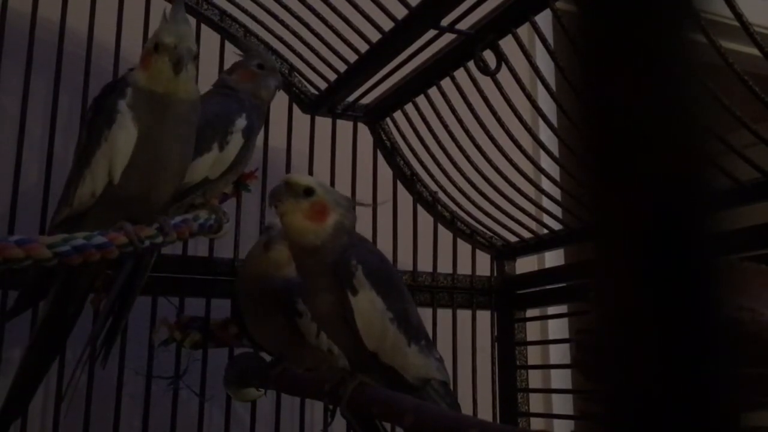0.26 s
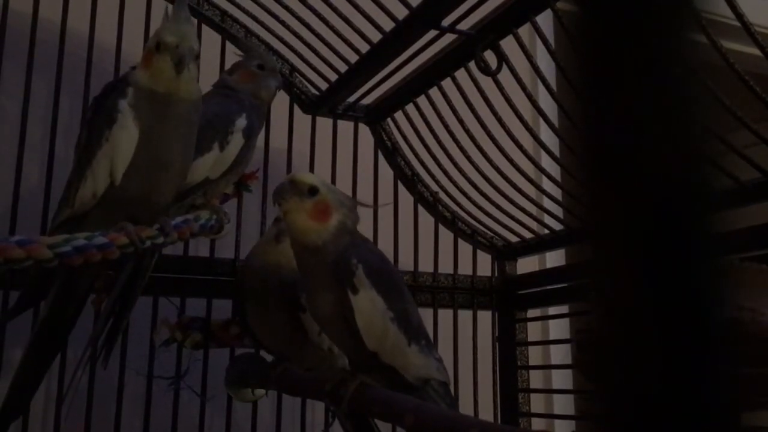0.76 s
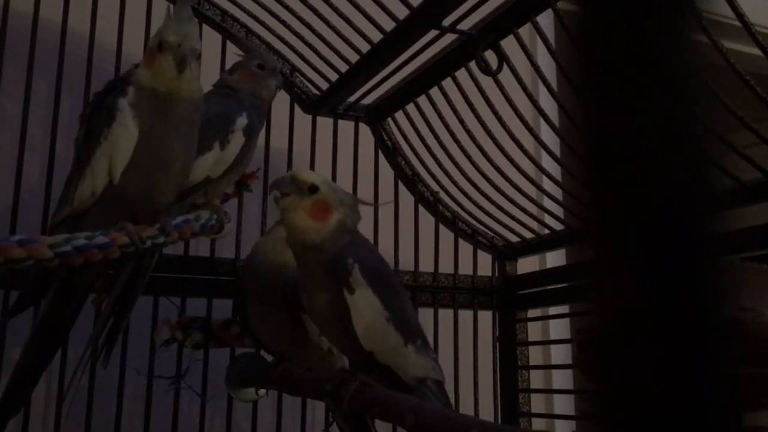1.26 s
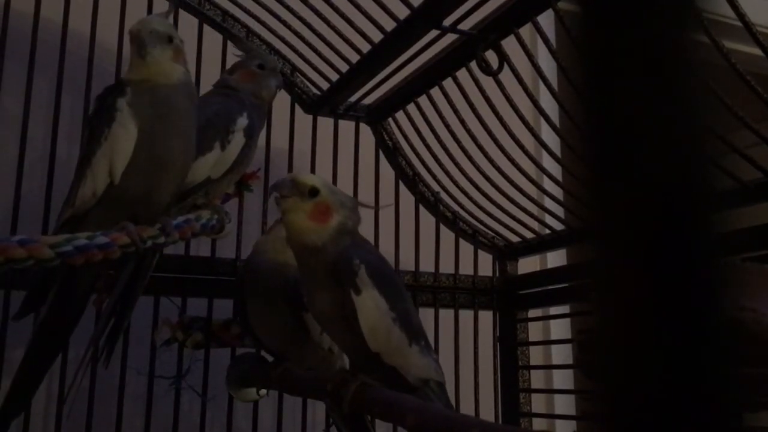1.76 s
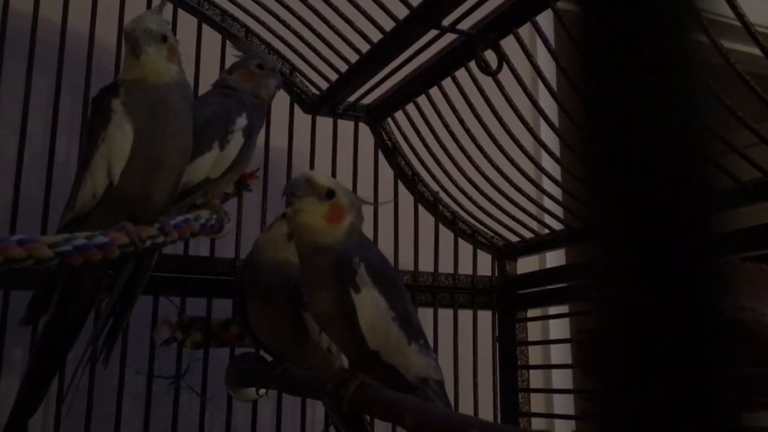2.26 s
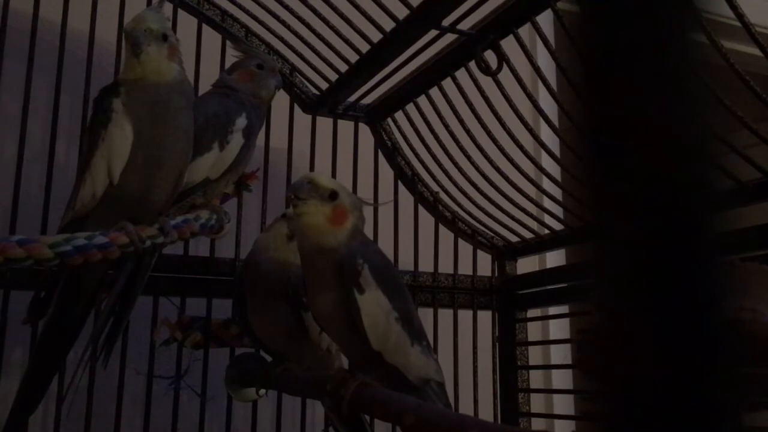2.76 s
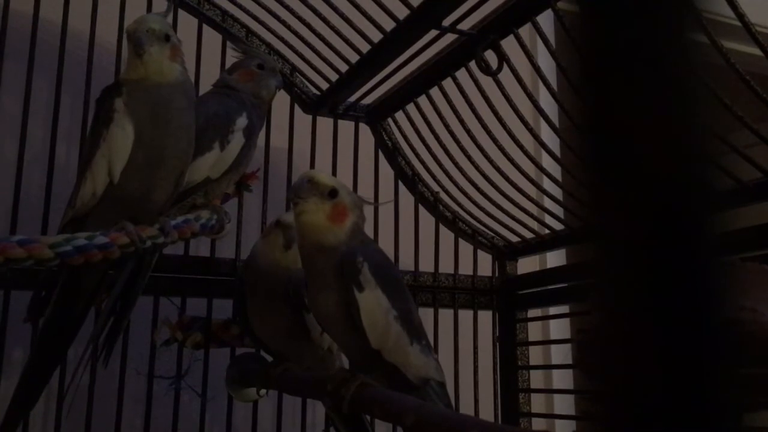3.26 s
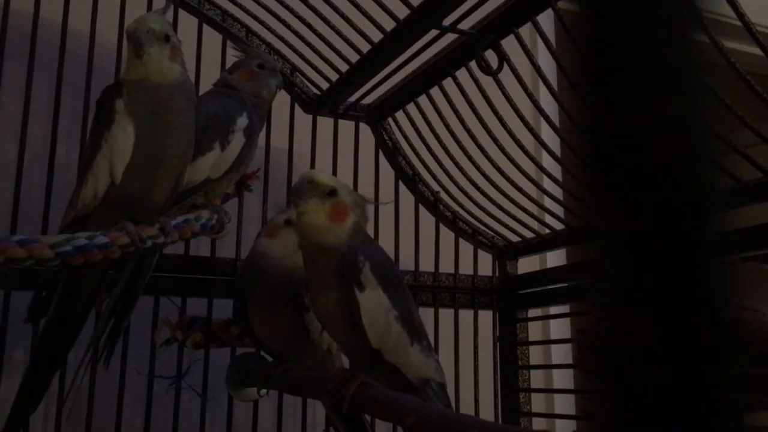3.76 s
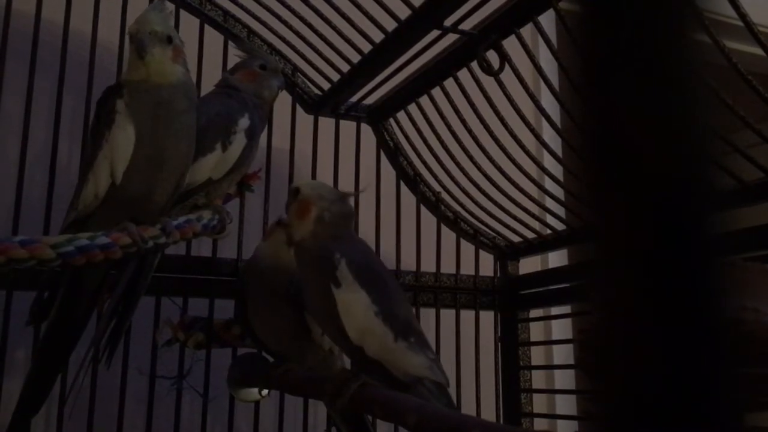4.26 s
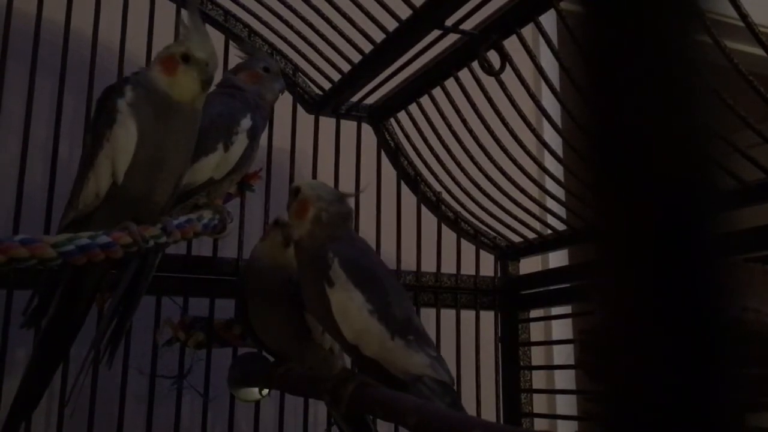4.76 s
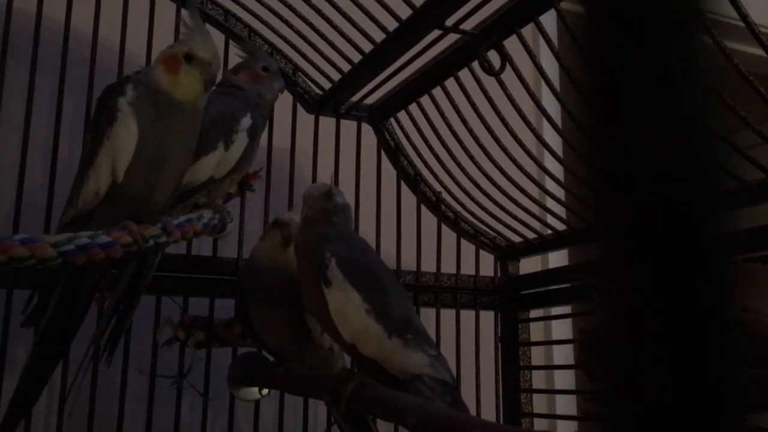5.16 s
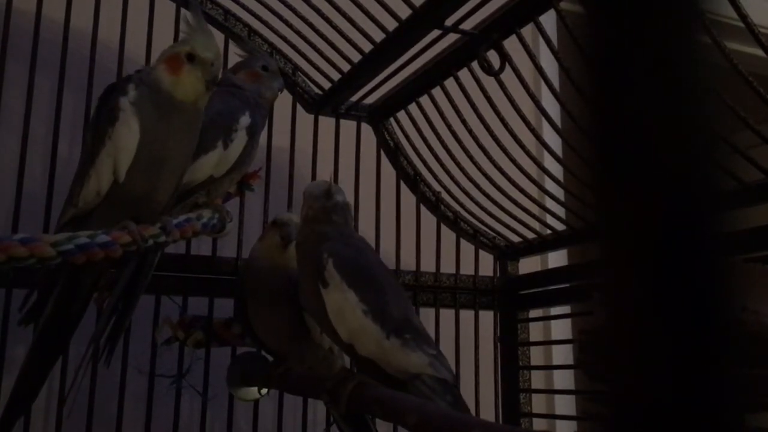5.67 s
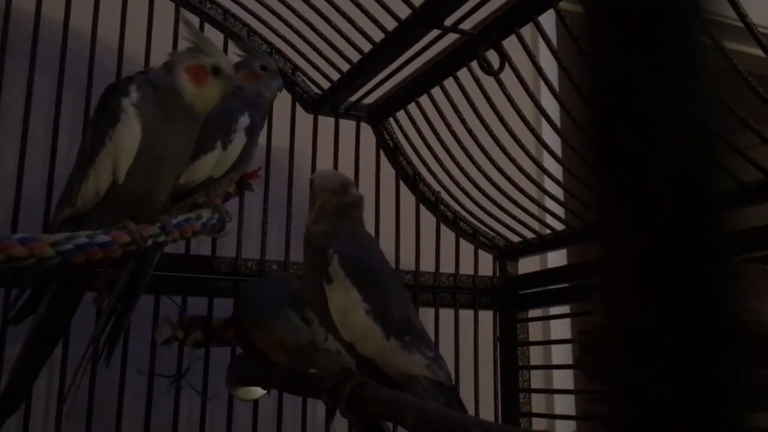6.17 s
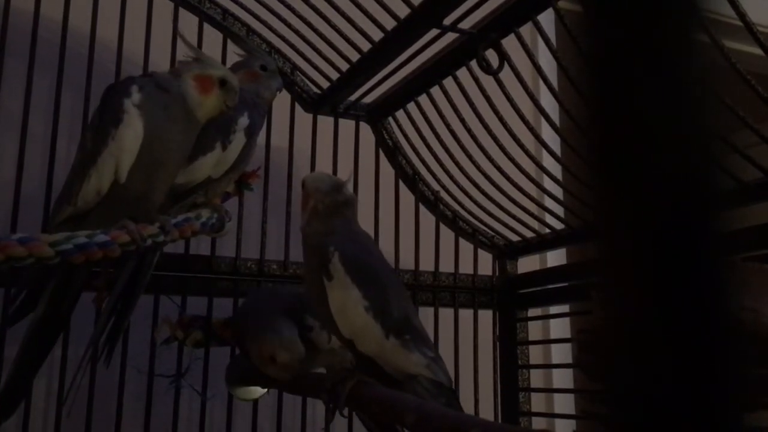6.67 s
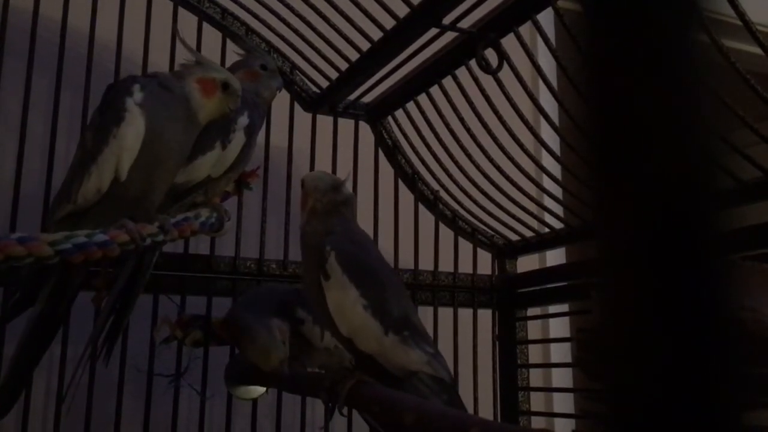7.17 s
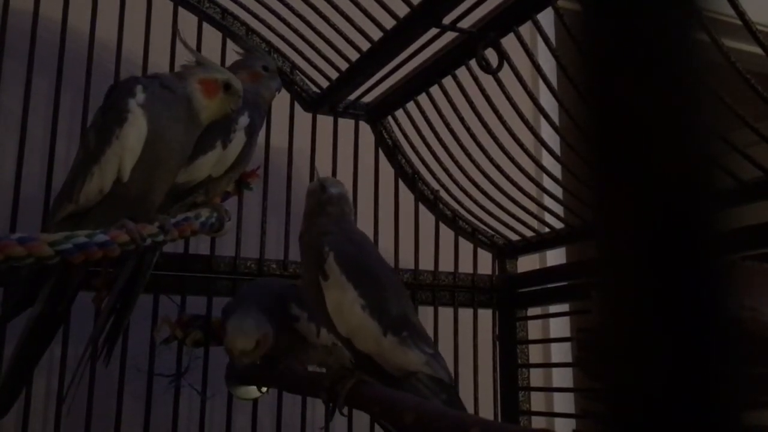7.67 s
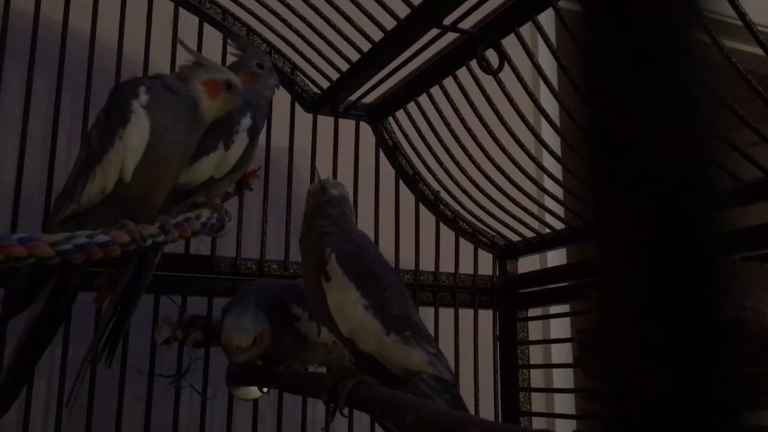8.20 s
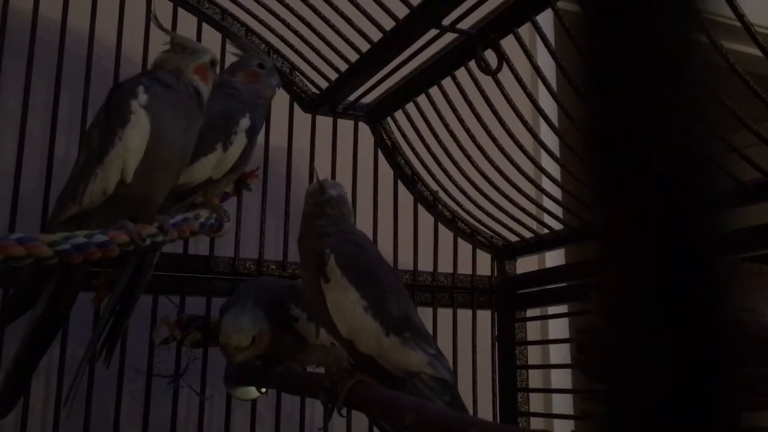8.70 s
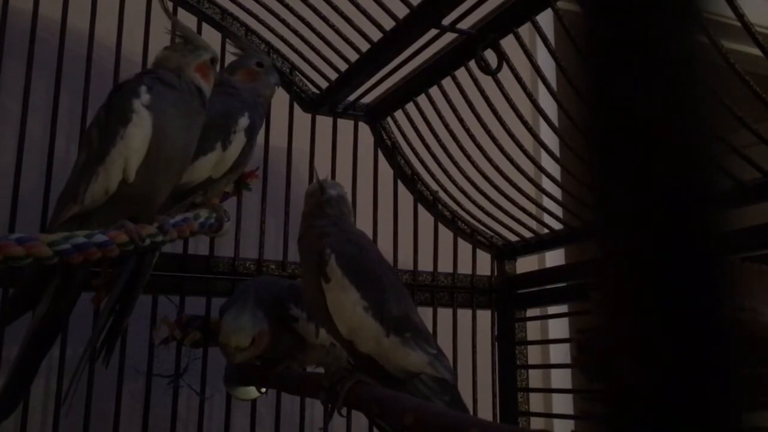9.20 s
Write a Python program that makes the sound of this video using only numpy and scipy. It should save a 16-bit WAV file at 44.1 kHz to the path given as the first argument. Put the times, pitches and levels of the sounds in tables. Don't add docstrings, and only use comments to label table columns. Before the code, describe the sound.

Close indoor pickup of cockatiels in a cage. After a second of quiet rustling, one bird whistles a rising sweep, a quick hook and five falling notes stepping lower. A pause with soft rustles and perch bumps, then the phrase repeats while another bird briefly squeaks and trills. Dull shuffles end it over soft room noise and faint low hum.

```python
import sys
import numpy as np
from scipy import signal
from scipy.fft import rfft, irfft, next_fast_len
from scipy.io import wavfile
from scipy.ndimage import uniform_filter1d, map_coordinates

SR = 44100
rng = np.random.default_rng(int(sys.argv[2]) if len(sys.argv) > 2 else 0)


def magnitude_from_level(level_db):
    exponent = np.asarray(level_db, float) / 20
    return 10 ** exponent


def output_pcm(signal):
    pcm = np.clip(np.atleast_2d(signal).T, -1, 1) * 32767
    wavfile.write(sys.argv[1], SR, np.round(pcm).astype(np.int16))


N = 416304

# time_s, pitch_hz, fundamental_db, octave_db, overtone_db (last two re fundamental)
SWEEP_SHAPE = [(0, 1658, -29, -4.5, -21), (.03, 1755, -26, -13, -28.5), (.06, 1941, -17, -31.5, -35.5),
               (.09, 2215, -19, -22.5, -25), (.1, 2401, -20, -24.5, -23.5), (.115, 2940, -19.5, -21, -35),
               (.135, 3310, -12.5, -26, -37.5), (.16, 3597, -14.5, -18.5, -29),
               (.197, 3632, -23.5, -26, -32.5)]
# time_s, pitch_hz, fundamental_db, octave_db, overtone_db
HOOK_SHAPE = [(0, 2753, -22, -36.5, -17.5), (.014, 2766, -19.5, -33, -15),
              (.038, 3041, -15.5, -34.5, -34.5), (.054, 3445, -22, -22, -35),
              (.068, 3351, -13.5, -30, -36.5), (.089, 2530, -23, -14.5, -22), (.1, 2370, -21, -17.5, -30.5),
              (.135, 1917, -14.5, -32.5, -33), (.168, 1744, -33.5, -18.5, -27.5)]
# start_s, stretch, top_shift_hz, level_db
SWEEPS_SUNG = [
    (1.036, 1, -9, 0.26),
    (5.709, 1.044, 23, 0.5),
]
# start_s, stretch, top_shift_hz, level_db
HOOKS_SUNG = [
    (1.362, 1.01, 129, 0.61),
    (6.036, 1.025, -100, -0.9),
]
# start_s, crest_s, fall_through_2khz_s, low_hz, top_hz
ARCHES_SUNG = [
    (1.631, 1.7, 1.807, 2451, 2897),
    (1.941, 2.032, 2.116, 2382, 2685),
    (2.264, 2.38, 2.442, 2306, 2489),
    (2.608, 2.698, 2.774, 2297, 2492),
    (2.928, 3.04, 3.115, 2295, 2388),
    (6.297, 6.372, 6.465, 2460, 2696),
    (6.604, 6.691, 6.775, 2339, 2548),
    (6.926, 7.019, 7.09, 2298, 2517),
    (7.251, 7.348, 7.434, 2367, 2538),
    (7.599, 7.695, 7.767, 2304, 2478),
]
# fundamental_db, octave_db, overtone_db
ARCH_STAGES = [
    (-31.5, -31.5, -15),
    (-35, -36.5, -9.5),
    (-29.5, -40, -7.5),
    (-18, -30.5, -19),
    (-15, -29.5, -24),
    (-18, -27, -22.5),
    (-17.5, -31.5, -35),
    (-19.5, -29.5, -28),
    (-36, -4, -20.5),
]
# time_s, octave_db, overtone_db, level_db, cancelled_hz (by a close reflection)
HEAD_AIM = [(1, -0.6, 0, -1, 1962), (1.7, 8, -4, -0.5, 2010), (2.1, 0, 0, -.5, 2010),
            (3.2, -4.5, 0, -3, 1969), (5.7, -1.1, -13.5, -1.5, 1942), (6.4, -1, -11.5, -0.06, 1928),
            (6.8, -9.5, -11.5, -1, 1923), (7.3, -1.5, -7, -0.5, 1970), (7.801, -3.5, -7.5, -4, 1910)]
# freq_hz, gain_db
OVERTONE_COLOUR = [(4500, -4.5), (7000, -8), (8700, -20.5), (9800, -12.5), (10600, -8), (11300, 3.5),
                   (12300, 6), (14000, -5), (15800, -8.5)]
# time_s, gain_db
HEAD_TURN = [(0, 6.5), (4.499, -3.5), (5, 9), (9.5, 2)]

# time_s, pitch_hz, level_db, beak_resonance_hz
MATE_SQUEAK = [
    (5.98, 1808, -37.5, 5600),
    (6.0, 1823, -33.5, 5500),
    (6.03, 1947, -37, 5448),
    (6.06, 1788, -59.5, 5400),
]
# time_s, pitch_hz, level_db, beak_resonance_hz
MATE_TRILL = [
    (6.22, 1830, -46.5, 5600),
    (6.24, 1842, -34, 5760),
    (6.26, 2015, -36, 5200),
    (6.28, 2162, -44, 4150),
    (6.31, 2076, -46.5, 4380),
    (6.335, 2182, -72, 4160),
]
# freq_hz, gain_db
MATE_THROAT = [(1400, -24.5), (1850, 5), (3200, -7.5), (4300, -1), (5600, -9), (7400, -17), (9800, -21.5),
               (12000, -22.5), (15500, -40)]

# time_s, level_db, ring_db
CLAW_KNOCKS = [
    (1.97, -66, -25),
    (5.985, -70, -20),
    (6.062, -64, -15),
    (6.204, -70, 8),
]
# freq_hz, level_db, t60_s
BAR_MODES = [(175, 5, .6), (725, -3, .5), (1180, -4, .5), (1390, -8, .12), (980, -10, .1)]
# start_s, length_s, level_db
FEATHER_BURSTS = [
    (0, 0.12, -70.5),
    (.48, 0.224, -70.5),
    (.81, 0.19, -66.5),
    (5.35, .17, -62.5),
    (5.5, .19, -65),
    (8.54, 0.075, -71),
]
# freq_hz, density_db
FEATHER_COLOUR = [(880, -16.5), (1500, -11), (1880, -9), (2470, -1.5), (3030, -12), (3610, -4),
                  (4270, -15.5), (5720, -9), (7670, -16.5), (9230, -12.5), (10500, -29.5), (11800, -15),
                  (15500, -24.5)]
# start_s, length_s, level_db
SHUFFLE_BURSTS = [
    (4.84, .16, -81),
    (8.72, 0.13, -67.5),
    (9.075, 0.274, -60),
]
# freq_hz, density_db
SHUFFLE_COLOUR = [(410, -30), (700, 0), (752, -20), (994, -8), (1640, -4.5), (2310, 1.5), (2580, -10.5),
                  (3110, -3.5), (4660, -24), (6000, -28), (7800, -56), (13200, -120)]
# start_s, length_s, level_db
BUMP_BURSTS = [
    (4.84, 0.12, -68),
    (5.31, .19, -68),
    (8.38, 0.14, -66),
    (8.74, 0.12, -61.5),
]
# freq_hz, density_db
BUMP_COLOUR = [(100, -30), (170, 6), (300, 2), (600, 0.5), (1000, -4.5), (1500, -36)]
# time_s, peak_db
BEAK_TICKS = [
    (.981, -33.5),
    (2.352, -61.5),
    (2.685, -50.5),
    (4.573, -57),
    (5.822, -47.5),
    (6.355, -61),
]

# freq_hz, t60_s
NEAR_DECAY = [(1500, 0.17), (13000, 0.03)]
# freq_hz, t60_s
WALL_DECAY = [(1500, 0.78), (2500, 0.67), (4500, 0.54), (7000, .25), (12000, 0.3), (15000, 0.14)]
# freq_hz, density_db
AIR_COLOUR = [(25, -32.5), (40, -15), (55, -9), (160, -12.5), (240, -15), (470, -21.5), (1060, -26.5),
              (2200, -30.5), (3000, -34), (3500, -36), (4900, -40.5), (6000, -39.5), (10500, -44.5),
              (15600, -49.5)]
# freq_hz, rms_db, unsteadiness_per_s
HUM_LINES = [(49, -67.5, 8.4), (113.6, -77, 4.9), (197.8, -66, 3), (392, -82, 3), (3564, -90.5, 2.905)]

SETTLE_S, ONSET_SHARP, CLIMB_S, CREEP = 0.03, 0.045, 0.05, 0.13
SAG, VOICE_LEAD_S, SWELL_LATE_S = 0.007, 0.014, 0.0049
FALL_HZ_PER_S, TIP, STEEP_S, STEEP_HZ = 12000, 0.27, 0.0077, 2105
TAIL_S, TAIL_S_PER_KHZ, LINGER_S, SLOW_HZ, END_HZ = 0.052, 0.05, 0.016, 1830, 1550
UNSTEADY_DB, NOTCH_DB, NOTCH_WIDTH_HZ = 1.2, 12, 60
SMEAR_RAD, SMEAR_RAD_PER_DB, DULL_DB_PER_KHZ = 0.15, 0.022, -0.13
FLUTTER_DB, RASP_DB = 2.5, -12
AIR_DB, DRAUGHT_DB = -58.5, 0.5
OCTAVE_ROOM_DB, OVERTONE_ROOM_DB = -2, 2
TOP_HZ = 15800


def unit(x):
    return x / np.sqrt(np.mean(x ** 2) + 1e-20)


def along(points, hz):
    f, v = np.transpose(points)
    return np.interp(np.log(hz + 1), np.log(f + 1), v)


def wobble(rate_hz, size=N):
    knots = rng.standard_normal(int(size * 1000 / SR) + 4)
    return map_coordinates(knots, [np.arange(size) * min(rate_hz, 999) / SR])


def coloured(spectrum):
    m = next_fast_len(N)
    gain = magnitude_from_level(along(spectrum, np.fft.rfftfreq(m, 1 / SR)))
    return unit(irfft(rfft(rng.standard_normal(m)) * gain, m)[:N])


def played(rows, round_s=0.011, rise_s=0.004, fall_s=0.006):
    s, *cols = np.transpose(rows)
    t = np.arange(s[0], s[-1], 1 / SR)
    gate = np.clip(np.minimum((t - s[0]) / rise_s, (s[-1] - t) / fall_s), 0, 1)
    width = int(round_s * SR) + 1
    curves = [uniform_filter1d(np.interp(t, s, c), width, mode="nearest") for c in cols]
    return round(s[0] * SR), gate, curves


def stretched(shape, start_s, stretch, top_shift_hz, level_db):
    rows = []
    for s, hz, db, *rest in shape:
        shift_hz = top_shift_hz * np.clip((hz - 2900) / 500, 0, 1)
        rows.append((start_s + stretch * s, hz + shift_hz, db + level_db, *rest))
    return rows


def arch(start_s, crest_s, drop_s, low_hz, top_hz):
    last = start_s == ARCHES_SUNG[-1][0]
    settled_s = start_s + SETTLE_S
    shoulder_s = drop_s - (top_hz - 2000) / FALL_HZ_PER_S
    steep_s = drop_s - STEEP_S
    tail_s = TAIL_S - TAIL_S_PER_KHZ * (top_hz - 2500) / 1000 + LINGER_S * last
    s = [start_s, settled_s, max(crest_s - CLIMB_S, settled_s + 0.004), crest_s, shoulder_s,
         (shoulder_s + steep_s) / 2, steep_s, drop_s + tail_s / 2, drop_s + tail_s]
    hz = [low_hz * (1 + ONSET_SHARP), low_hz, low_hz + CREEP * (top_hz - low_hz), top_hz, top_hz * (1 - SAG),
          top_hz - TIP * (top_hz - STEEP_HZ), STEEP_HZ, SLOW_HZ - 60 * last, END_HZ - 90 * last]
    voiced_s = np.array(s)
    voiced_s[2] += SWELL_LATE_S
    voiced_s[3] -= VOICE_LEAD_S
    grid_s = np.union1d(s, voiced_s)
    levels = [np.interp(grid_s, voiced_s, c) for c in np.transpose(ARCH_STAGES)]
    return np.column_stack([grid_s, np.interp(grid_s, s, hz)] + levels)


def notes():
    sweeps = [stretched(SWEEP_SHAPE, *r) for r in SWEEPS_SUNG]
    hooks = [stretched(HOOK_SHAPE, *r) for r in HOOKS_SUNG]
    return sweeps + hooks + [arch(*r) for r in ARCHES_SUNG]


def whistle():
    tone, octave, overtones = np.zeros((3, N))
    breath = coloured([(3500, -47.5)] + OVERTONE_COLOUR[1:])
    aim_s, *aim = np.transpose(HEAD_AIM)
    for rows in notes():
        at, gate, (hz, db, octave_db, over_db) = played(rows)
        more_octave, more_over, effort_db, notch_hz = (np.interp(at / SR, aim_s, a) for a in aim)
        octave_db, db = octave_db + more_octave, db + effort_db
        smear_rad = SMEAR_RAD + SMEAR_RAD_PER_DB * abs(more_over)
        fallen_khz = (np.maximum.accumulate(hz) - hz) / 1000
        over_db = over_db + more_over + more_over * DULL_DB_PER_KHZ * fallen_khz
        n = len(gate)
        t = np.arange(n) / SR
        held_hz = uniform_filter1d(hz, 1300, origin=649, mode="nearest")
        strain = np.clip((held_hz - 3250) / 300, 0, 1)
        droop = 0.074 * np.exp((t - t[-1]) / 0.0047)
        hz = hz * (1 - droop + 0.0035 * wobble(70, n) + 0.02 * strain * wobble(500, n))
        phase = 2 * np.pi * np.cumsum(hz) / SR
        level = gate * magnitude_from_level(db + 3.0 + 2.0 * strain * wobble(297.7, n)) * np.sqrt(2)

        notch_db = NOTCH_DB / (1 + ((hz - notch_hz) / NOTCH_WIDTH_HZ) ** 2)
        note = magnitude_from_level(UNSTEADY_DB * wobble(67, n) - notch_db) * np.sin(phase)
        third = magnitude_from_level(-14.5 - 5 * (hz - 2000) / 1000) * np.sin(3 * phase)
        octave[at:at + n] += level * magnitude_from_level(octave_db + 3.26 * wobble(60, n)) * (np.sin(2 * phase) + third)

        high = np.zeros(n)
        for k in range(3, 12):
            partial_gain = (k * hz < 16500) * magnitude_from_level(along(OVERTONE_COLOUR, k * hz) + 4.3 * wobble(60, n))
            high += partial_gain * np.sin(k * phase + smear_rad * wobble(220, n))
        onset = 1 - np.exp(-t / 0.008)
        overtones[at:at + n] += level * onset * magnitude_from_level(over_db - 2.5) * (high + magnitude_from_level(-24) * breath[at:at + n])

        half_db = -55 - 0.04 * (hz[0] - 2400) + 4 * wobble(120, n) - 60 * t / 0.55
        half = magnitude_from_level(half_db) * np.sin(phase / 2 + 1.5 * wobble(200, n)) * (2200 < hz[0] < 2700)
        dull = uniform_filter1d(uniform_filter1d(rng.standard_normal(n + 1), size=14), size=9)
        pop = magnitude_from_level(-50.5 - 60 * t / 0.025) * np.diff(dull)
        tone[at:at + n] += level * note + gate * half + pop
    return tone, octave, overtones


def mate():
    out = np.zeros(N)
    for rows, depth, rough, trilled in ((MATE_SQUEAK, 0.004, 0.012, 0), (MATE_TRILL, 0.055, 0.025, 1)):
        at, gate, (hz, db, beak_hz) = played(rows)
        n = len(gate)
        flutter = np.sin(2 * np.pi * 105 * np.arange(n) / SR)
        hz = hz * (1 + depth * flutter + rough * wobble(470, n))
        phase = 2 * np.pi * np.cumsum(hz) / SR
        voice = np.zeros(n)
        for k in range(1, 9):
            beak_db = 10 / (1 + ((k * hz - beak_hz) / 900) ** 2)
            partial_db = along(MATE_THROAT, k * hz) + beak_db + 3 * wobble(120, n)
            voice += magnitude_from_level(partial_db) * np.sin(k * phase + k * k)
        rasp = magnitude_from_level(RASP_DB) * trilled * coloured([(2600, -61.5)] + MATE_THROAT[2:])[:n]
        out[at:at + n] += gate * magnitude_from_level(db - FLUTTER_DB * trilled * flutter) * (voice + rasp)
    return out


def cage():
    out, t = np.zeros(N), np.arange(SR // 2) / SR
    for s, db, ring_db in CLAW_KNOCKS:
        ring = np.zeros(len(t))
        for hz, level_db, t60_s in BAR_MODES:
            ring += magnitude_from_level(level_db + rng.normal(0, 2.5) - 60 * t / t60_s) * np.sin(2 * np.pi * hz * t)
        tap = magnitude_from_level(15 - 60 * t / 0.025) * uniform_filter1d(rng.standard_normal(len(t)), size=12)
        out[round(s * SR):][:len(t)] += magnitude_from_level(db) * (magnitude_from_level(ring_db) * ring + tap)
    return out


def swells(rows, rise_s, sag_db_per_s):
    gain = np.zeros(N)
    for s, length_s, db in rows:
        ends = [(s, db), (s + length_s, db - sag_db_per_s * length_s)]
        at, gate, (level_db,) = played(ends, rise_s=rise_s, fall_s=0.032)
        gain[at:at + len(gate)] += gate * magnitude_from_level(level_db)
    return gain


def fidgets():
    feathers = coloured(FEATHER_COLOUR) * magnitude_from_level(0.72 * wobble(48))
    shuffles = coloured(SHUFFLE_COLOUR) * magnitude_from_level(1.87 * wobble(58))
    out = swells(FEATHER_BURSTS, rise_s=0.05, sag_db_per_s=22) * feathers
    out += swells(SHUFFLE_BURSTS, rise_s=0.018, sag_db_per_s=70) * shuffles
    out += swells(BUMP_BURSTS, rise_s=0.04, sag_db_per_s=15) * coloured(BUMP_COLOUR)
    t = np.arange(400) / SR
    for s, db in BEAK_TICKS:
        click = np.diff(rng.standard_normal(len(t) + 1))
        out[round(s * SR):][:len(t)] += magnitude_from_level(db - 6.0 - 60 * t / 0.0033) * click
    return out


def echo(x, decay, delay_s):
    hz, t, z = signal.stft(rng.standard_normal(SR), SR, nperseg=256)
    fade = magnitude_from_level(-60 * t / along(decay, hz)[:, None])
    tail = signal.istft(z * fade, SR, nperseg=256)[1]
    delayed = np.pad(x, (int(delay_s * SR), 0))
    return signal.fftconvolve(delayed, tail / np.linalg.norm(tail))[:N]


def background():
    t = np.arange(N) / SR
    hum = np.zeros(N)
    for hz, db, rate_hz in HUM_LINES:
        level = magnitude_from_level(db + 2.5 + 1.2 * wobble(rate_hz))
        hum += level * np.sin(2 * np.pi * hz * t + 1.0 * wobble(rate_hz))
    return magnitude_from_level(AIR_DB - 6.0 + DRAUGHT_DB * wobble(3.7)) * coloured(AIR_COLOUR) + hum


def scene():
    tone, octave, overtones = whistle()
    other = mate()
    turn_s, turn_db = np.transpose(HEAD_TURN)
    turn = magnitude_from_level(np.interp(np.arange(N) / SR, turn_s, turn_db))
    treble = magnitude_from_level(OCTAVE_ROOM_DB) * octave + magnitude_from_level(OVERTONE_ROOM_DB) * overtones
    sent = tone + turn * treble + other + cage()
    room = magnitude_from_level(-12.5) * echo(sent, NEAR_DECAY, 0.003) + magnitude_from_level(-15.5) * echo(sent, WALL_DECAY, 0.016)
    direct = tone + octave + overtones + other + cage()
    return (direct + room + fidgets() + background())[None]


def roll_off(x):
    return signal.sosfilt(signal.butter(12, 15800, fs=SR, output="sos"), x)


def record(dry):
    loud_db = 10 * np.log10(np.abs(uniform_filter1d(dry ** 2, int(0.4 * SR))) + 1e-9)
    x = dry * magnitude_from_level(-1.5 * np.clip((loud_db + 55) / 15, 0, 1))
    m = next_fast_len(N)
    passed = np.fft.rfftfreq(m, 1 / SR) < TOP_HZ
    mix = irfft(rfft(x, m) * passed, m)[:, :N]
    return roll_off(mix)


dry = scene()
out = record(dry)
output_pcm(out)
```